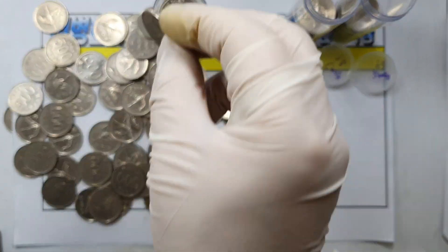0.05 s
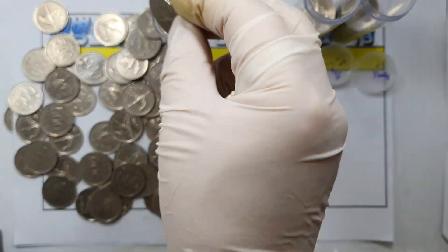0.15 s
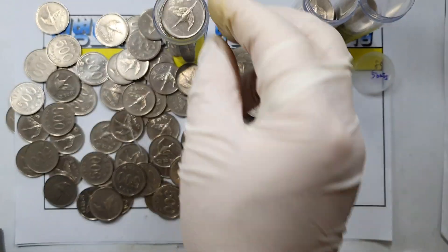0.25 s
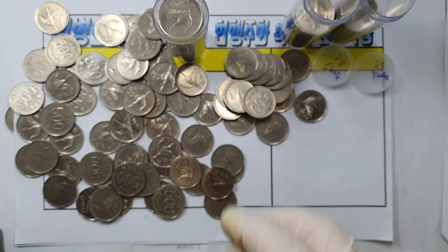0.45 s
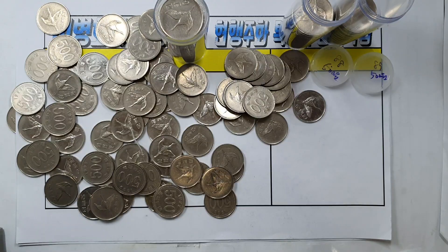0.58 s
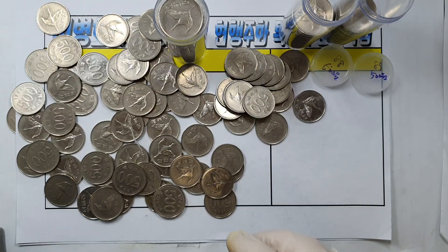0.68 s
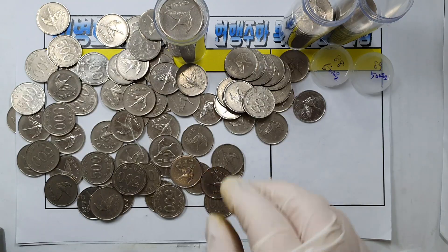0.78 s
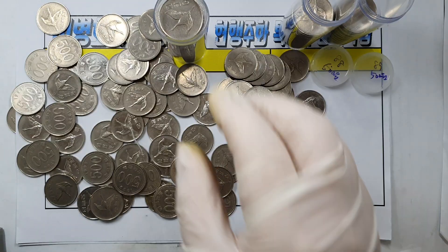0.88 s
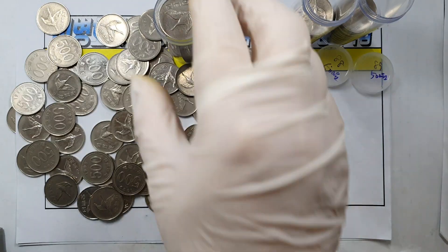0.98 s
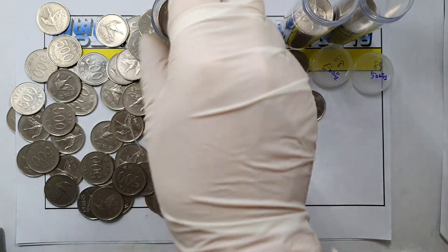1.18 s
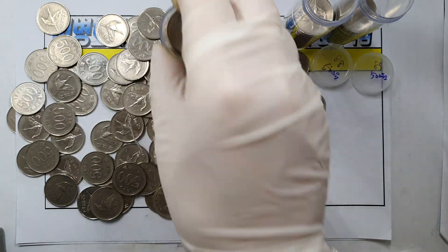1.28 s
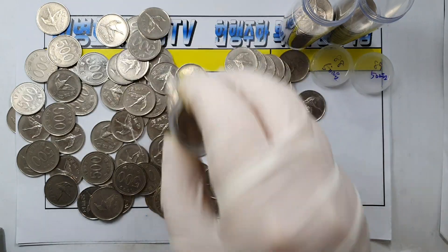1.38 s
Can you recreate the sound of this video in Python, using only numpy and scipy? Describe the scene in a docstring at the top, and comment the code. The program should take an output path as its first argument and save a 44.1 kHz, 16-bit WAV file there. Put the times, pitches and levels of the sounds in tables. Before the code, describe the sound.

A coin lands on a small pile at about 0.2 seconds, close on the left, clinking and scraping with a very high ring, light desk knocks and hollow plastic tube taps. It settles by 0.35 seconds. From 0.8 seconds a glove rustles faintly and rubs the tube, coins click softly around 1.2 seconds, and a dull desk bump comes at 1.4. A faint low room hum lies underneath.

```python
"""A small, quiet room with a low hum and a paper-covered desk. Close to the left microphone, a gloved
hand lets a coin slip onto a small pile. The coin clinks, scrapes and settles: each hit sets the metal
ringing very high and the blows knock the desk, along with two hollow notes as of a plastic coin tube.
The hand comes back with a rustle, nudges the coins, rubs the tube and bumps the desk."""
import sys
import numpy as np
from scipy import signal
from scipy.fft import rfft, irfft
from scipy.io import wavfile
from scipy.ndimage import uniform_filter1d

SR = 44100
rng = np.random.default_rng(int(sys.argv[2]) if len(sys.argv) > 2 else 0)


def unload_audio(sound):
    """Save the sound as a 16-bit wav file, at the path given as the first command line argument."""
    columns = np.transpose(np.atleast_2d(sound))
    # keep every value between -1 and 1, then stretch to whole-number steps
    steps = np.round(np.clip(columns, -1, 1) * 32767)
    wavfile.write(sys.argv[1], SR, steps.astype(np.int16))


N = 63945
T = np.arange(N) / SR
HZ = np.fft.rfftfreq(2 * N, 1 / SR)
# tone of a click on a coin's edge (frequency [Hz], level [dB])
CLICK_SPECTRUM = [(200, -31.5), (1100, -26.5), (2300, -9.5), (3300, -6), (4500, 2), (5700, -7), (6700, 1),
                  (7500, -4.5), (8400, -2.5), (11000, -3.5), (13500, 4.5), (15500, -0.5)]


def amp(db):
    """Turns decibels into a gain."""
    return 10 ** (np.asarray(db) / 20)


def value_at(points, hz):
    """Looks up a table between its rows, on a log-frequency axis."""
    row_hz, value = np.transpose(points)
    return np.interp(np.log(hz + 1), np.log(row_hz + 1), value)


def level(points):
    """Turns (time [s], level [dB]) points into a gain over time."""
    return amp(np.interp(T, *np.transpose(points)))


def colour(x, spectrum, keep_power=True):
    """Filters a sound; with keep_power, only the spectrum's shape counts, not its overall level."""
    gain = amp(value_at(spectrum, HZ))
    if keep_power:
        gain = gain / np.sqrt(np.mean(gain ** 2))
    log_gain = np.log(np.r_[gain, gain[-2:0:-1]])
    response = np.exp(np.conj(signal.hilbert(log_gain)))[:N + 1]  # nothing sounds before its cause
    return irfft(rfft(x, 2 * N) * response)[..., :N]


def decay(start, fade_s, rise_s):
    """A quick rise, then a fade. A fade time is how long a sound takes to fall by 60 dB."""
    age = np.maximum(T - start, 0)
    return np.minimum(age / rise_s, 1) * amp(-60 * age / fade_s)


def ring(hits, notes, rise_s, width_hz, choke_db_per_s=0):
    """Each hit rings all the notes, blurred by width_hz; with a choke, the next hit damps them."""
    out, t = np.zeros(N + SR), T[:SR // 5]
    stops = [start for start, _ in hits[1:]] + [T[-1]]
    for (start, hit_db), stop in zip(hits, stops):
        steps = rng.standard_normal((len(notes), len(t))) * np.sqrt(width_hz / (2 * np.pi * SR))
        drifts = uniform_filter1d(np.cumsum(steps, 1), size=24, axis=1)
        tone = sum(amp(db - 60 * t / fade_s) * np.sin(2 * np.pi * (hz * t + drift))
                   for (hz, db, fade_s), drift in zip(notes, drifts))
        choke_db = choke_db_per_s * np.maximum(start + t - stop, 0)
        out[int(start * SR):][:len(t)] += amp(hit_db - choke_db) * np.minimum(t / rise_s, 1) * tone
    return out[:N]


def resonate(x, notes):
    """Lets a sound ring an object's own narrow notes."""
    response = sum(amp(db) * 1j * HZ * width / (hz ** 2 - HZ ** 2 + 1j * HZ * width)
                   for hz, width, db in notes)
    return irfft(rfft(x, 2 * N) * response)[:N]


def friction(slips_per_s, spread_db, hiss):
    """Rubbing surfaces make tiny slips of uneven size over a smooth hiss."""
    sizes = rng.uniform(-1, 1, N) * amp(spread_db * np.minimum(rng.exponential(1, N), 2))
    slips = sizes * (rng.random(N) < slips_per_s / SR)
    rubbing = slips / (slips.std() + 1e-12) + hiss * rng.standard_normal(N)
    return rubbing / rubbing.std()


def hum_and_air():
    """A wavering low hum with its octave, and the faint air of the room."""
    # the hum swells and sinks (time [s], level [dB])
    hum_levels = [(0, -60.5), (.08, -105), (.17, -76), (.28, -70), (.36, -57.5), (.55, -64), (.85, -71.5),
                  (.92, -66.5), (1.1, -71.5), (1.24, -55.5), (1.36, -67), (1.45, -61)]
    # tone of the air (frequency [Hz], level [dB])
    air_spectrum = [(15, -52.5), (40, -15.5), (64, -8), (108, -10), (150, -25.5), (300, -33.5),
                    (550, -39.5), (1370, -43.5), (4500, -51.5), (6600, -42), (7400, -56.5), (16000, -59)]
    hum_hz, waver_hz = 58.9, 2.0
    drift = uniform_filter1d(rng.standard_normal(N), SR // 8)
    phase = 2 * np.pi * np.cumsum(hum_hz + waver_hz * drift / drift.std()) / SR
    hum = level(hum_levels) * (np.sin(phase) + amp(-22.5) * np.sin(2 * phase))
    air = colour(0.64 * rng.standard_normal(N) + 0.26 * rng.standard_normal((2, N)), air_spectrum)
    return hum * amp([[3.5], [1.5]]) + amp(-70.5) * air


def room_echo(x):
    """The room gives each side a short wash of echoes, its treble dying first."""
    # how long the echo lasts (frequency [Hz], fade time [s])
    fade_times = [(100, 0.63), (500, 0.27), (1400, 0.29), (3700, 0.19), (9000, 0.16), (13500, 0.145)]
    # tone of the echo (frequency [Hz], level [dB])
    echo_spectrum = [(100, -12), (300, -11.5), (520, -7.5), (700, -9.5), (850, -4.5), (1100, -11),
                     (1700, -16), (2500, -16), (4500, -19.5), (9000, -20), (12500, -16), (13400, -31.5),
                     (14300, -31), (15500, -20.5)]
    hz, t, noise = signal.stft(rng.standard_normal((2, SR // 2)), SR, nperseg=256)
    fall = amp(-60 * t / value_at(fade_times, hz)[:, None])
    tail = signal.istft(noise * fall / np.sqrt((fall ** 2).mean(1, keepdims=True)), SR, nperseg=256)[1]
    tail *= np.minimum(T[:tail.shape[1]] / 0.024, 1)  # the echoes build up
    tail /= np.linalg.norm(tail, axis=1, keepdims=True)
    return signal.fftconvolve(colour(x, echo_spectrum, keep_power=False)[None], tail, axes=1)[:, :N]


def arm():
    """The sleeve swishes softly as the arm moves."""
    # strength of the swish (time [s], level [dB])
    swish_levels = [(0, -80), (.05, -100), (.13, -100), (.17, -74.5), (.3, -86.5), (.74, -100),
                    (.77, -75.5), (.85, -79.5), (.97, -70), (1.12, -80), (1.45, -90)]
    # tone of the sleeve (frequency [Hz], level [dB])
    sleeve_spectrum = [(1000, -14), (3000, -8.5), (4000, -4), (6500, 4.5), (7500, -4.5), (10000, -9.5),
                       (15500, -16)]
    return colour(rng.standard_normal((2, N)) * level(swish_levels), sleeve_spectrum)


def desk_and_tube():
    """Blows ring the desk top, the soft hand makes it thud, and taps ring the hollow tube."""
    # taps on the tube (time [s], low note [dB], high note [dB])
    taps = [(.2050, -39, -39), (.2470, -44, -31.5), (.2595, -22, -26), (.2720, -32, -44),
            (.9915, -52.5, -80), (1.0148, -48, -80)]
    # blows passed on to the desk, and bumps of the hand (time [s], level [dB])
    blows = [(.1965, -40.5), (.2075, -27.5), (.2385, -29.5), (.2570, -32.5), (.2845, -28), (.3170, -33),
             (.3925, -49), (.992, -60), (1.2125, -50.5), (1.235, -50.5), (1.285, -58.5), (1.403, -40)]
    bumps = [(.985, -60.5), (1.3975, -29.5), (1.440, -49)]
    # the desk's notes for each of the two (frequency [Hz], level [dB], fade time [s])
    knock_notes = [(216, -11, 0.1), (379.6, -11.5, 0.13), (466, -1.5, 0.046), (546.2, 0.5, 0.065),
                   (707, -13, 0.045), (855.5, -13, 0.087)]
    thud_notes = [(121.4, 0, 0.12), (153.6, 4.5, 0.078)]
    low_hz, high_hz, tube_fade_s = 1741, 2300, .095
    low = ring([(s, db) for s, db, _ in taps], [(low_hz, 0, tube_fade_s)], rise_s=.0015, width_hz=1)
    high = ring([(s, db) for s, _, db in taps], [(high_hz, 0, tube_fade_s)], rise_s=.0015, width_hz=1)
    knocks = ring(blows, knock_notes, rise_s=.0023, width_hz=15)
    thuds = ring(bumps, thud_notes, rise_s=.011, width_hz=1.7)
    return knocks + thuds + low + high


def coin_ticks():
    """Coins tick under the fingers: a click and a short ring."""
    # the ticks (time [s], level [dB])
    ticks = [(1.2118, -34), (1.2184, -37)]
    # their ring (frequency [Hz], level [dB], fade time [s])
    notes = [(5630, 8.5, 0.022), (6670, -3, 0.038), (3870, -4, 0.06), (3170, -8, 0.089), (2270, -3, 0.062),
             (545, -19.5, .13)]
    force = sum(amp(db - 19) * decay(s, fade_s=.19, rise_s=.00057) for s, db in ticks)
    clicks = colour(force * rng.standard_normal(N), CLICK_SPECTRUM)
    return clicks + ring(ticks, notes, rise_s=.0014, width_hz=35)


def glove_rustle():
    """The glove rustles as it rubs."""
    # strength of the rubbing (time [s], level [dB])
    rub_levels = [(.76, -88.5), (.80, -79), (.88, -86), (.95, -72.5), (1.005, -67), (1.04, -62),
                  (1.11, -71.5), (1.16, -82), (1.185, -57), (1.24, -75), (1.28, -60.5), (1.30, -81.5),
                  (1.385, -66), (1.415, -52), (1.45, -56)]
    # tone of the glove (frequency [Hz], level [dB])
    glove_spectrum = [(150, -11.5), (550, -0.5), (1100, -9), (1750, 3), (2200, -1), (3500, 6), (4500, 2.5),
                      (5600, -3.5), (6800, -11), (8000, -23.5), (15500, -28)]
    return colour(friction(slips_per_s=620, spread_db=3.5, hiss=1.5) * level(rub_levels), glove_spectrum)


def tube_rub():
    """The glove drags the tube into ringing."""
    # the rubbed tube's notes (frequency [Hz], width [Hz], level [dB])
    notes = [(524, 100, -11), (1740, 73, 1), (1780, 53, -7.5), (3434, 30, 1.5), (4330, 100, -2.5)]
    drag = rng.standard_normal(N) * amp(-41) * decay(start=1.012, fade_s=.61, rise_s=.0054)
    return resonate(drag, notes)


def coin_nudges():
    """Short clacks: metal on metal is bright, the soft glove on metal is dull."""
    # the glove nudges the coins (time [s], level [dB], treble [dB])
    touches = [(0.3937, -46.5, -20), (0.9915, -52.5, -7), (1.0145, -55.5, -5), (1.173, -52, -12),
               (1.1925, -43.5, -12), (1.2114, -31.5, 1.5), (1.2178, -32.5, 0), (1.2307, -41, -4),
               (1.2698, -42.5, 1), (1.305, -51, -12), (1.3238, -51.5, -13), (1.405, -45.5, -10),
               (1.425, -43, -11)]
    # tone of a clack (frequency [Hz], level [dB])
    clack_spectrum = [(200, -16), (520, 2.5), (700, 2.5), (850, -5), (1150, -1), (1700, -0.5), (2300, 7),
                      (3300, 3.5), (4500, 0), (5600, -1.5), (7500, -7.5), (12000, -12), (15500, -14.5)]
    treble_hz = 5706  # a soft touch leaves out what lies above
    noise = rng.standard_normal(N)
    body = irfft(rfft(noise, 2 * N) / (1 + (HZ / treble_hz) ** 10))[:N]
    treble = noise - body
    clacks = sum(amp(db) * decay(s, fade_s=.038, rise_s=.00028) * (body + amp(treble_db) * treble)
                 for s, db, treble_db in touches)
    return colour(clacks, clack_spectrum)


def rim_plucks():
    """The glove plucks at a coin's rim, which rings briefly."""
    # the plucks (time [s], level [dB])
    plucks = [(1.173, -55), (1.1915, -50)]
    # the rim's notes (frequency [Hz], level [dB], fade time [s])
    notes = [(3220, 5, 0.033), (1943, -4.5, 0.12), (3820, -11, .025), (2900, -5, 0.019)]
    return ring(plucks, notes, rise_s=.00078, width_hz=25)


def hand():
    """The gloved hand moves among the coins and the tube."""
    return coin_ticks() + glove_rustle() + tube_rub() + coin_nudges() + rim_plucks()


def falling_coin():
    """A coin clicks, rattles and scrapes on another; both ring, and the pile beneath rings along."""
    # coin hits coin (time [s], click [dB], lower coin's ring [dB], upper coin's ring [dB])
    clinks = [(0.1962, -41, -58, -57.5), (0.2062, -9.5, -28.5, -24.5), (.2120, -21, -29.5, -13.5),
              (.2180, -39.5, -26, -7), (.2365, -16, -21.5, -23.5), (.2440, -22, -20.5, -31),
              (0.258, -12.5, -24.5, -36.5), (.2620, -13.5, -20, -31), (.2685, -27.5, -25, -49),
              (0.2798, -25.5, -28, -11), (0.282, -12, -11.5, -26.5), (0.291, -22.5, -19, -24.5),
              (0.2961, -19.5, -17.5, -26.5), (0.3079, -19.5, -30, -22.5), (0.3191, -16, -32.5, -15),
              (0.3265, -25, -30.5, -30), (.3345, -25, -30, -30.5)]
    # each coin's notes (frequency [Hz], level [dB], fade time [s])
    lower_notes = [(13560, 3.5, 0.13), (13150, -10.5, .05), (12920, -15, .06), (9848, -18, .08),
                   (6770, -22.5, .06), (4465, -23, .06), (5638, -27.5, .07)]
    upper_notes = [(14138, -1.5, .085), (14250, -10, 0.081), (14420, -11.5, .06), (8297, -16, 0.06),
                   (4920, -24, 0.05)]
    # how hard the sliding coin presses (time [s], level [dB])
    slide_levels = [(.194, -76), (.198, -31), (.204, -39.5), (.212, -27.5), (.23, -31.5), (.262, -25.5),
                    (.276, -33), (.286, -27.5), (.304, -34), (.328, -31), (.340, -32), (.353, -77)]
    # tone of the scrape (frequency [Hz], level [dB])
    scrape_spectrum = [(200, -7.5), (550, 4), (1050, -7.5), (1400, 0.5), (2100, -4), (2480, -9),
                       (2750, 0.5), (3300, -3), (4500, -3.5), (5700, -0.5), (6700, 6.5), (7500, -6),
                       (8400, 0.5), (11000, 1.5), (14000, -4), (15500, 8.5)]
    # the pile's notes (frequency [Hz], width [Hz], level [dB])
    pile_notes = [(2885, 139.4, 1.5), (3600, 65, -0.5), (4460, 110, -2.5), (4910, 140, -2), (5660, 70, 3.5),
                  (6790, 80, -2), (8400, 190, 1), (9850, 32, 4)]
    strike_s, settled_s, damping_db_per_s = .2056, .3367, 1493
    power = np.zeros(N)
    for start, db, _, _ in clinks:
        click = decay(start, fade_s=.008, rise_s=.0001)
        rattle = amp(-3.5) * decay(start, fade_s=.056, rise_s=.0028)
        power += amp(db) ** 2 * (click ** 2 + rattle ** 2)
    strike = amp(6.7) * (np.arange(N) == int(strike_s * SR))  # one sharp, hard hit
    clicks = colour(np.sqrt(power) * rng.choice([-1., 1.], N) - strike, CLICK_SPECTRUM)
    # touching coins jostle each other, which blurs their notes; each new hit stops the earlier ring
    contact = dict(rise_s=.0012, width_hz=16, choke_db_per_s=2498.5)
    lower = ring([(s, db) for s, _, db, _ in clinks], lower_notes, **contact)
    upper = ring([(s, db) for s, _, _, db in clinks], upper_notes, **contact)
    sliding = friction(slips_per_s=1100, spread_db=2.0, hiss=0.36) * level(slide_levels)
    scrape = colour(sliding, scrape_spectrum)
    damping = amp(-damping_db_per_s * np.maximum(T - settled_s, 0))  # rings die once the coin lies flat
    clatter = amp(-2.5) * (scrape + clicks * damping)
    return clatter + (resonate(clatter, pile_notes) + lower + upper) * damping


def microphones(source, right_db, scatter):
    """The left microphone hears a source directly; the shaded right one, later and partly scattered."""
    # shading of the right side (frequency [Hz], level [dB])
    shade = [(100, -2), (600, -6), (1500, -9), (4500, -16.5), (8500, -7.5), (12000, -14), (14000, -25)]
    lag_s = .0002  # the right microphone is farther away
    direct = source()
    right = np.roll(direct + scatter * source(), int(lag_s * SR)) / np.hypot(1, scatter)
    return np.array([direct, amp(right_db) * colour(right, shade, keep_power=False)])


def scene():
    """Coins, desk and hand in the humming room, in stereo."""
    metal = microphones(falling_coin, right_db=0, scatter=2)
    wood = microphones(desk_and_tube, right_db=-7.0, scatter=0.2)
    glove = microphones(hand, right_db=2.0, scatter=1.9)
    echo = room_echo(amp(-0.5) * metal[0] + amp(-6.5) * wood[0] + amp(1.5) * glove[0])
    return metal + wood + glove + echo + arm() + hum_and_air()


def record(dry):
    """Cuts off the very highest treble."""
    cutoff_hz = 15850
    low_pass = signal.firwin(255, cutoff_hz, window=("kaiser", 8), fs=SR)
    return signal.oaconvolve(dry, low_pass[None], "same", axes=1)


dry = scene()
out = record(dry)
unload_audio(out)
```